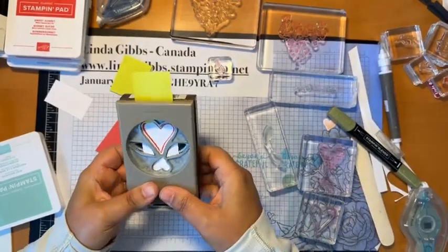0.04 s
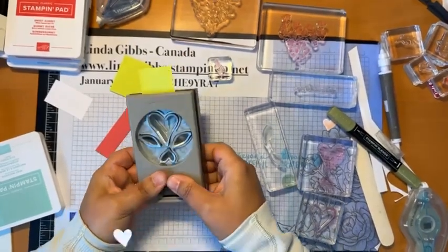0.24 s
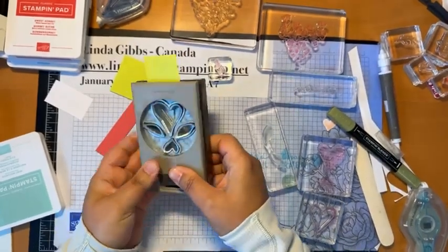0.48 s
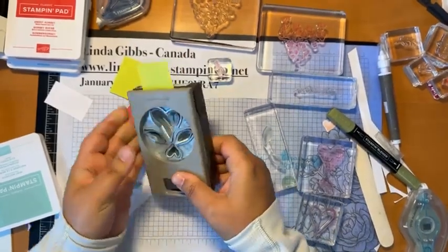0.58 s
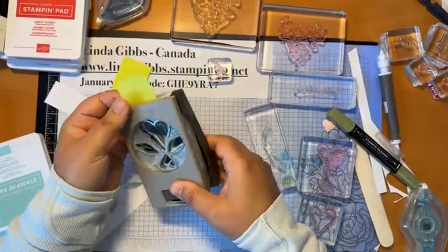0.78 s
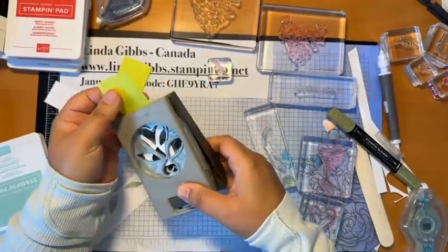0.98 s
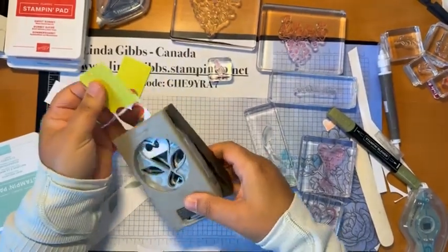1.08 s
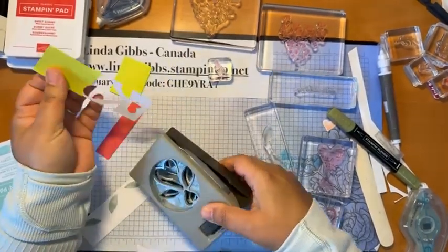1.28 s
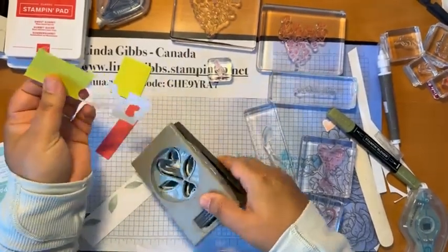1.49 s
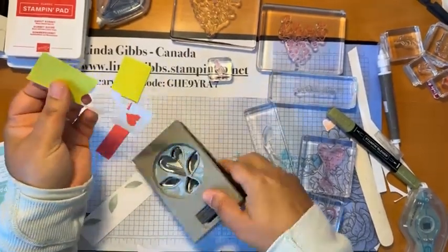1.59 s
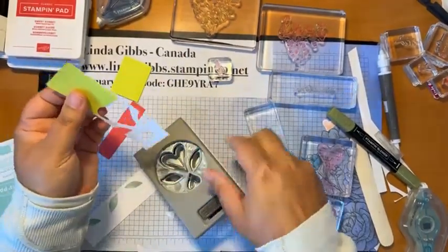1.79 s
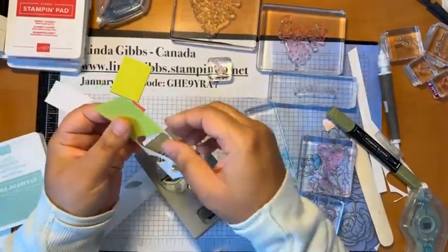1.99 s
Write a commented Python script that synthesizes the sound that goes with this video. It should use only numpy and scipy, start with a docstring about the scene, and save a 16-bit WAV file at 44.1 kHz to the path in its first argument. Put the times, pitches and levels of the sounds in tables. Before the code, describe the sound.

A hand-held paper punch crunches into card and breaks through with a sharp metallic snap. The card slides out with a soft rustle and light ticks, then the punch knocks dully onto a desk, close by in a small room.

```python
"""A hand-held lever punch bites into card, then breaks through with a sharp metallic snap.
The card slides out of the slot with a soft rustle, a faint squeak and a few ticks. The punch is
lowered onto a paper-covered desk: two soft bumps, a dull knock that rocks, and a last nudge.
Noise bursts make the hits, fading tones make the metal and desk ring, and a small room echoes."""
import sys
import numpy as np
from scipy import signal
from scipy.fft import rfft, irfft
from scipy.io import wavfile
from scipy.ndimage import uniform_filter1d

SR = 44100
rng = np.random.default_rng(int(sys.argv[2]) if len(sys.argv) > 2 else 0)


def master_out(mix):
    """Clip the mix to full scale and print it as 16-bit PCM to the path in sys.argv[1]."""
    frames = np.transpose(np.atleast_2d(mix))
    ceiling = np.clip(frames, -1, 1)
    pcm = np.round(ceiling * 32767).astype(np.int16)
    wavfile.write(sys.argv[1], SR, pcm)


N = 90404
T = np.arange(N) / SR
TOP_HZ = 15800


def amp(db):
    """Turn decibels into a volume multiplier."""
    return 10 ** (np.asarray(db) / 20)


def curve(points):
    """Draw volume over time through (time_s, level_db) points."""
    return amp(np.interp(T, *np.array(points).T, left=-120))


def fade(ring_s):
    """Die away by 60 dB in ring_s seconds."""
    return np.exp(-np.log(1000) * T / ring_s)


def delay(x, seconds):
    """Start a sound later."""
    return np.interp(T - seconds, T, x, left=0)


def convolve(x, response):
    """Pass a sound through something, given how that thing answers a single click."""
    return signal.fftconvolve(x, response)[:N]


def colour(x, points):
    """Make some pitches louder and others softer, following (pitch_hz, level_db) points."""
    size = 8192
    hz, db = np.array(points).T
    freqs = np.fft.rfftfreq(size, 1 / SR) + 1
    gains = amp(np.interp(np.log(freqs), np.log(hz), db))
    # fold the filter in time so that nothing sounds before the hit
    cepstrum = irfft(np.log(gains))
    cepstrum[1:size // 2] *= 2
    cepstrum[size // 2 + 1:] = 0
    return convolve(x, irfft(np.exp(rfft(cepstrum))))


def band(x, low_hz, high_hz, order=2):
    """Keep the pitches between two limits."""
    sos = signal.butter(order, [low_hz, min(high_hz, SR / 2 - 1)], "band", fs=SR, output="sos")
    return signal.sosfilt(sos, x + 1e-18)


def flatten(x):
    """Make all pitches in a noise equally strong, keeping its energy."""
    spectrum = rfft(x)
    return irfft(spectrum / (abs(spectrum) + 1e-18), len(x)) * np.sqrt(np.sum(x ** 2))


def burst(start_s, level_db, decay_s):
    """A rough contact: sudden noise that dies away."""
    size = 8192
    envelope = np.exp(-np.minimum(T[:size] / decay_s, 20))
    noise = flatten(envelope * rng.standard_normal(size)) * envelope ** .25
    return amp(level_db) * np.pad(noise, (max(int(start_s * SR), 0), N))[:N]


def punch_bite():
    """The cutter presses into the card with a short crunch."""
    # presses into the card: start_s, level_db, decay_s
    bites = [(.003, -49, 0.0099), (.0075, -30, 0.009), (0.0113, -19, 0.0097), (0.017, -18.5, 0.0059)]
    # tone of the crunch: pitch_hz, level_db
    bite_colour = [(40, -17.5), (130, -18.5), (290, -3), (700, -7), (950, -5.5), (1180, 6.5), (1600, -7.5),
                   (1980, 4.5), (2250, -7), (2550, 3), (2950, -14), (3550, -5.5), (4000, -16.5),
                   (5600, -12.5), (7500, -23), (9500, -26.5), (12500, -23.5), (16000, -31.5)]
    return colour(sum(burst(*row) for row in bites), bite_colour)


def card_rustle():
    """Paper fibres catch and slip on the slot, making thousands of tiny clicks."""
    # loudness of the rubbing: time_s, level_db
    slide = [(0, -51.5), (.48, -113), (.505, -49.5), (.55, -60), (.62, -69.5), (.69, -64), (.732, -49),
             (.77, -68.5), (.82, -80), (.85, -59.5), (.89, -55.5), (.935, -47), (.955, -58.5),
             (1.02, -64.5), (1.08, -52.5), (1.14, -48), (1.2, -63.5), (1.245, -63), (1.29, -59),
             (1.36, -60.5), (1.42, -85), (2.05, -76)]
    # tone of rubbed card: pitch_hz, level_db
    card_colour = [(50, -14.5), (130, -5), (360, -10), (750, -9), (1300, -4), (1700, -3.5), (2300, -3),
                   (3000, -6), (4700, 0), (6500, -5), (7800, -7), (9300, -14), (12500, -9.5),
                   (16000, -13.5)]
    clicks_per_s, spread_db, flutter_db = 6000, 2.5, 1.6
    clicks = (rng.random(N) < clicks_per_s / SR) * rng.standard_normal(N)
    clicks *= amp(spread_db * np.minimum(rng.exponential(size=N), 5))  # a few stand out
    drift = uniform_filter1d(rng.standard_normal(N), size=600)
    flutter = amp(flutter_db * drift / drift.std())
    return colour(clicks / clicks.std() * flutter * curve(slide), card_colour)


def light_ticks():
    """Card edges, fingers and the punch touch lightly, each around its own pitch."""
    # light touches: start_s, level_db, decay_s, pitch_hz, width_octaves
    touches = [(.195, -53.5, 0.033, 2482, 3.4), (0.401, -40, .025, 104, 1.8),
               (0.489, -39.5, 0.0049, 6000, 0.62), (.496, -44.5, 0.0017, 5900, 1.22),
               (.533, -51.5, 0.0039, 4500, 2.1), (.539, -47.5, 0.0077, 1500, 2.2),
               (.593, -52, .002, 5830, 1), (0.638, -61, 0.031, 7450, 1.66), (0.931, -70, 0.0015, 9000, 1.5),
               (0.981, -39, 0.008, 2020, 0.64), (0.986, -41.5, 0.0091, 248, 2.3),
               (1.13, -39, 0.04, 360, 0.31), (1.135, -37.5, .008, 1770, 0.56),
               (1.2576, -39.5, 0.0016, 2070, 1.4), (1.259, -45.5, 0.021, 352, 1.04),
               (1.346, -46.5, 0.0027, 5990, 0.52), (1.359, -47, 0.0071, 6000, 0.65),
               (1.4559, -40, 0.015, 841, 1.38), (1.459, -32.5, 0.017, 930, 0.16),
               (1.582, -58.5, .012, 4940, 0.94), (1.594, -39.5, 0.013, 1400, 0.53),
               (1.914, -50, .004, 3720, 0.6), (1.964, -51, 0.044, 2198, 0.28),
               (1.966, -55, 0.036, 4400, 0.3), (1.967, -51, 0.036, 530, 1.86)]
    return sum(band(burst(start, db, decay), hz / 2 ** (width / 2), hz * 2 ** (width / 2))
               for start, db, decay, hz, width in touches)


def punch_snap():
    """Quick tears build up to the slam of the cutter, which rings the metal body."""
    # the card tears and the cutter slams home: start_s, level_db, decay_s, crack_db
    snaps = [(0.23, -43, 0.014, -60.5), (0.2374, -30, 0.02, -63.5), (.242, -21, 0.007, -55),
             (0.2449, -11.5, 0.0084, -44), (0.249, -6, 0.0035, -26), (.251, -5.5, 0.0023, -16),
             (0.2544, -12.5, 0.0014, -20.5), (0.2562, -17.5, 0.0022, -37.5), (0.2635, -18, 0.0005, -42),
             (0.266, -16, 0.00083, -40)]
    # tone of the snap: pitch_hz, level_db
    snap_colour = [(30, -27), (110, -25.5), (190, -20.5), (260, -9.5), (370, -7.5), (520, 2), (900, 2.5),
                   (1050, -3.5), (1300, 2), (2500, 3), (4000, 2.5), (7000, -2), (8200, -8), (12000, -16),
                   (16000, -22)]
    # ringing notes of the metal body: pitch_hz, level_db, ring_s
    metal_notes = [(890, -5, .36), (1230, -7, .3), (1365, -10, .33), (1712, -1, .28), (2080, -6, .25),
                   (2347, -6, .25), (2460, 3, .25), (2568, -1, .25), (3365, -4, .2), (3512, -3, .22),
                   (3898, -3, .2), (4355, -5, .26), (5126, 0, .24), (5495, -6, .26)]
    blows = colour(sum(burst(start, db, decay) for start, db, decay, _ in snaps), snap_colour)
    cracks = sum(burst(start, db, decay_s=.004) for start, _, _, db in snaps)
    slam = blows + band(cracks, low_hz=10500, high_hz=TOP_HZ)
    loudest_s = max(snaps, key=lambda row: row[1])[0]
    ring = sum(amp(db) * fade(ring_s) * np.sin(2 * np.pi * hz * T) for hz, db, ring_s in metal_notes)
    return slam, amp(-33) * delay(ring, loudest_s)


def card_squeak():
    """Rubbing in the slot keeps the card's edge singing faintly around one pitch."""
    # loudness of the squeak: time_s, level_db
    levels = [(.63, -91), (.68, -83), (.74, -65), (.81, -88), (.87, -66.5), (.95, -67.5), (1.02, -100),
              (1.15, -72), (1.22, -104)]
    pitch_hz, width_hz = 1820, 300
    tone = band(rng.standard_normal(N), pitch_hz - width_hz / 2, pitch_hz + width_hz / 2)
    return curve(levels) * tone / tone.std()


def desk_knocks():
    """Cushioned bumps make the desk ring while the punch's casing clacks."""
    # the punch meets the desk: start_s, thump_db, contact_s, clack_db
    knocks = [(1.464, -22, 0.0023, -43), (1.519, -27.5, 0.0026, -79), (1.598, -13, 0.00094, -28.5),
              (1.722, -33, 0.0023, -77), (1.7768, -25.5, .0003, -12), (1.7815, -8, 0.00076, -21.5),
              (1.812, -37, 0.0018, -32), (1.833, -16.5, 0.00089, -33), (1.86, -31, .0007, -43)]
    # ringing notes of the desk: pitch_hz, level_db, ring_s
    desk_notes = [(79.3, -11.5, 0.11), (120.2, -8, .11), (141.7, -6, 0.12), (173, -8, 0.12),
                  (214.6, -0.5, 0.054), (259, -6, 0.092), (327, -6.5, 0.041), (427.7, -16.5, 0.071),
                  (506, -19.5, 0.073), (723, -21.5, 0.3)]
    # tone of the clack: pitch_hz, level_db
    clack_colour = [(30, -14), (120, -22), (300, 8.5), (550, 2), (800, -7.5), (1200, -14.5), (1500, -14.5),
                    (2200, -17), (3200, -20.5), (5000, -25), (7500, -37), (10000, -53), (16000, -46)]
    swell_cycles, lag_at_100_hz_s = 0.37, 0.0026
    push, desk = 0, 0
    for start, db, contact_s, _ in knocks:
        age = np.clip((T - start) / contact_s, 0, 20)
        push += amp(db) * age * np.exp(-age) / (contact_s * SR)
    for hz, db, ring_s in desk_notes:
        swell = 1 - np.exp(-T * hz / swell_cycles)
        note = fade(ring_s) * swell * np.sin(2 * np.pi * hz * T)
        lag_s = lag_at_100_hz_s * np.sqrt(100 / hz)  # low notes travel slower as the desk bends
        desk += amp(db) * delay(note, lag_s)
    clacks = sum(burst(start, db, decay_s=0.0065) for start, _, _, db in knocks)
    thump = band(convolve(push, desk), low_hz=79.4, high_hz=3080, order=3)
    return colour(clacks, clack_colour), thump


def desk_nudge():
    """The punch judders a little way over the desk, which hums."""
    # loudness of the hum: time_s, level_db
    levels = [(1.92, -78), (1.95, -50.5), (2.0, -54.5), (2.05, -74)]
    pitch_hz = 115
    return curve(levels) * np.sqrt(2) * np.sin(2 * np.pi * pitch_hz * T)


def room_echo():
    """Reflections blur into a short tail, each octave fading at its own speed."""
    # how long the room rings: pitch_hz, ring_s
    ring_times = [(100, 0.35), (300, 0.2), (900, .29), (3000, 0.29), (6500, 0.26), (14000, .22)]
    first_echo_s = 0.0049
    hz, seconds = np.array(ring_times).T
    spectrum, freqs = rfft(rng.standard_normal(N)), np.fft.rfftfreq(N, 1 / SR)
    tail = 0
    for low_hz in 22.5 * 2 ** np.arange(10):
        octave = irfft(spectrum * (freqs >= low_hz) * (freqs < 2 * low_hz), N)
        ring_s = np.interp(np.log(low_hz * np.sqrt(2)), np.log(hz), seconds)
        tail += octave * fade(ring_s)
    tail *= T > first_echo_s
    return tail / np.sqrt(np.sum(tail ** 2))


def scene():
    """Punch, card and desk share one small room with a quiet background rumble."""
    # tone of the room's background noise: pitch_hz, level_db
    air_colour = [(20, -37.5), (60, -14.5), (110, -5), (200, -11.5), (500, -17.5), (1500, -18), (5000, -30),
                  (16000, -35.5)]
    room = room_echo()

    def in_room(x, echo_db):
        """Add the room's echo to a sound."""
        return x + amp(echo_db) * convolve(x, room)

    slam, ring = punch_snap()
    clack, thump = desk_knocks()
    mix = in_room(punch_bite(), echo_db=-5) + in_room(slam, echo_db=-1.5) + ring
    mix += in_room(card_rustle() + card_squeak(), echo_db=-4)
    mix += in_room(light_ticks(), echo_db=-3.5)
    mix += in_room(thump, echo_db=-17) + in_room(clack, echo_db=0.5) + desk_nudge()
    mix += amp(-52) * colour(rng.standard_normal(N), air_colour)
    return mix[None]


def record(dry):
    """Round off the loudest peaks and cut the highest treble."""
    ceiling = 1.1
    rounded = ceiling * np.tanh(dry / ceiling)
    return signal.sosfilt(signal.ellip(10, .2, 80, TOP_HZ, fs=SR, output="sos"), rounded)


dry = scene()
out = record(dry)
master_out(out)
```